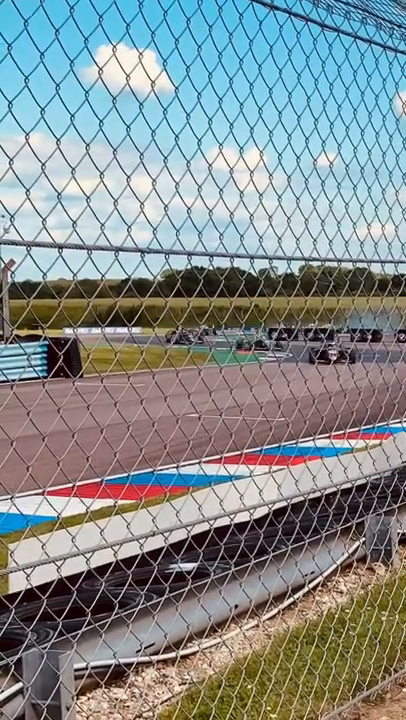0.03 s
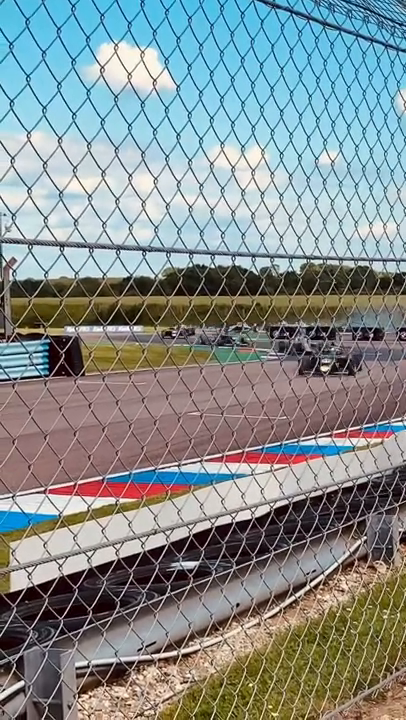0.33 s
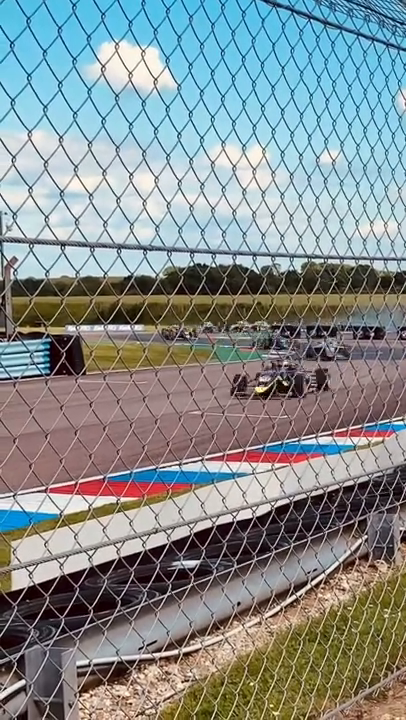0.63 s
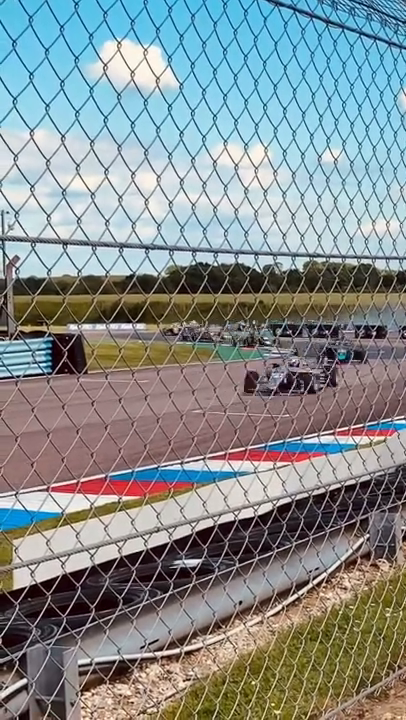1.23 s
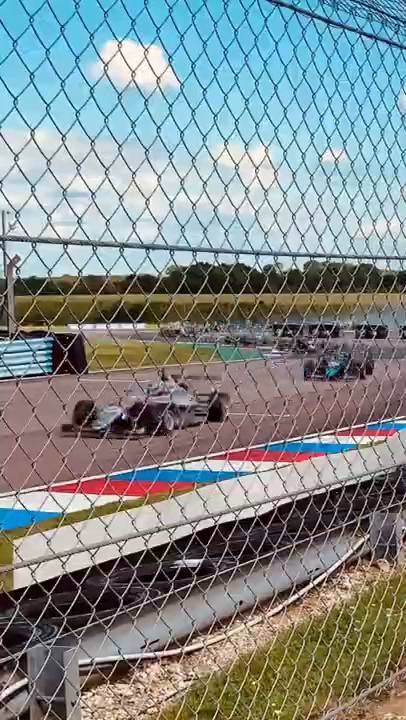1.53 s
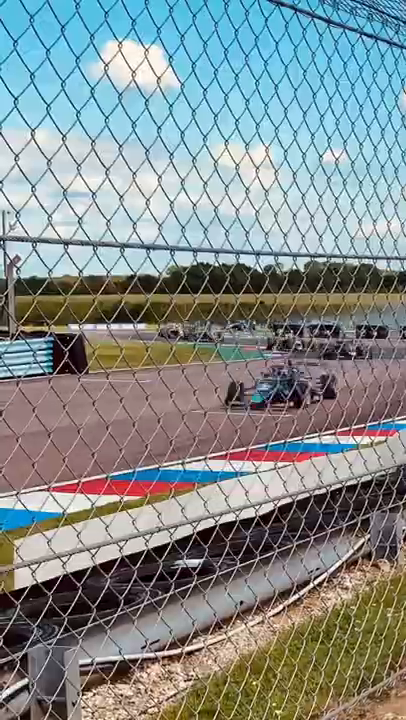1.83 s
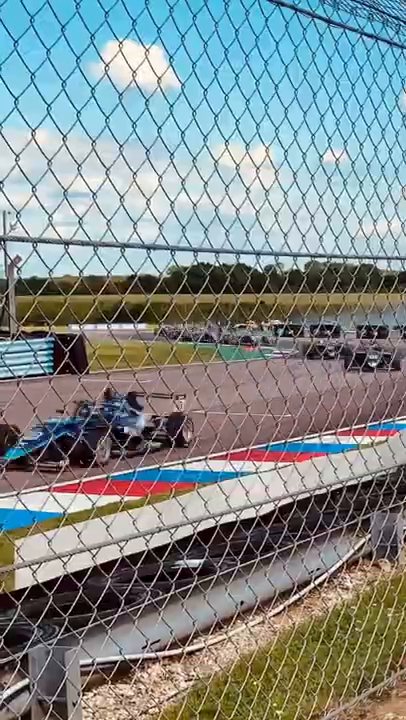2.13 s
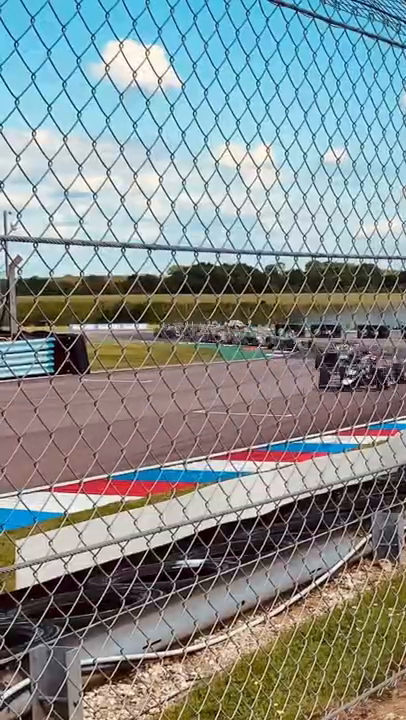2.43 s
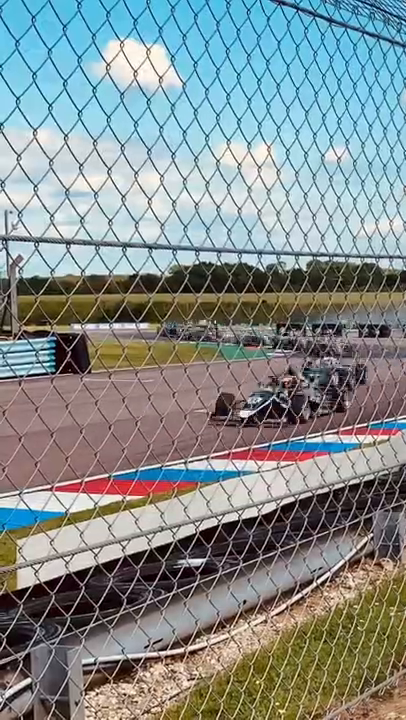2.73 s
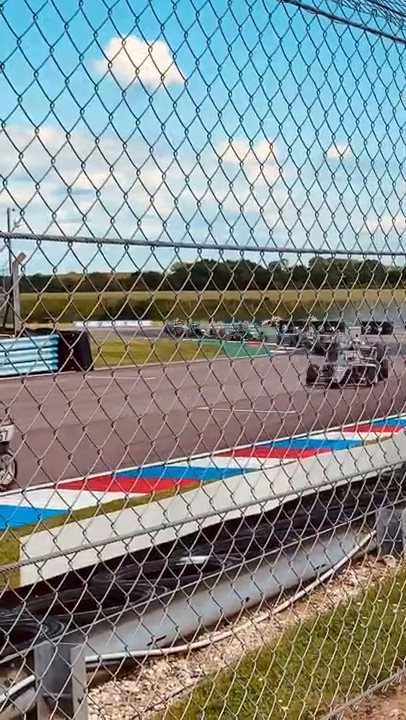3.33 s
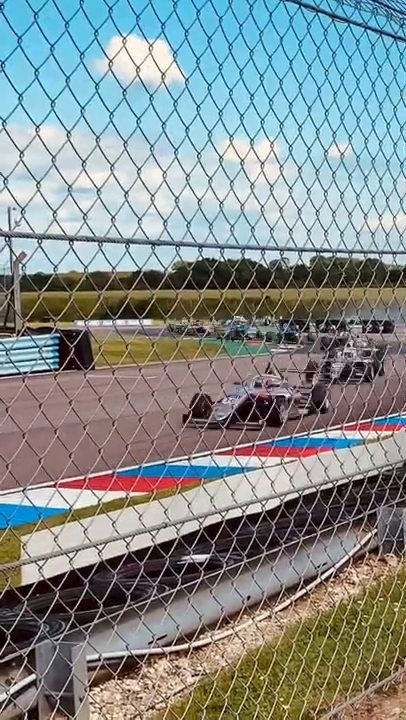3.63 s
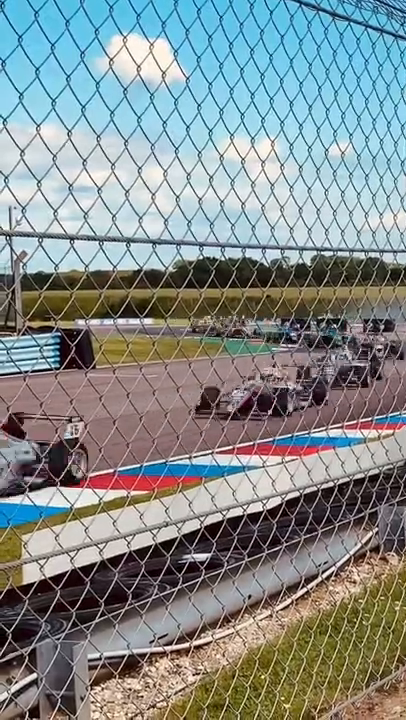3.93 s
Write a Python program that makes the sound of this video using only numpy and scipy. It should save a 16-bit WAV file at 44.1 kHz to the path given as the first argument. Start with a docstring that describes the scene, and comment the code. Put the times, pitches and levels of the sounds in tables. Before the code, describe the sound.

Race cars roar past a trackside fence, six in quick succession. Each engine drones, then drops in pitch with a barking, spitting exhaust rasp. The distant pack roars behind, tyres hiss, and wind bumps the microphone at first.

```python
"""Six single-seater race cars sweep past a trackside fence, one after another.
Each four-cylinder engine drones, drops in pitch as it shifts up and goes by, and throws out a bark
and a pulsing rasp from its exhaust. Spits, blurts and short whines cut in, and the pack roars behind.
Tyres hiss and wind bumps on two microphones that hear the middle pitches in opposite polarity:
one swings up while the other swings down."""
import sys
import numpy as np
from scipy import signal
from scipy.fft import rfft, irfft
from scipy.io import wavfile

SR = 44100
rng = np.random.default_rng(int(sys.argv[2]) if len(sys.argv) > 2 else 0)


def digitize_waveform(pressure):
    """Quantize a signal to 16-bit integers and store it at the path in sys.argv[1].

    Rows of a 2-D input are taken as channels; values are limited to [-1, 1].
    """
    field = np.atleast_2d(pressure).T
    bounded = np.clip(field, -1, 1)
    quanta = np.round(bounded * 32767).astype(np.int16)
    wavfile.write(sys.argv[1], SR, quanta)


N = 176400
T = np.arange(N) / SR
HZ = np.maximum(np.arange(N // 2 + 1) * SR / N, 1)

# One list per car. Each row: time in seconds, firings per second as heard, level in dB.
CAR_TRACKS = [
    [(0, 180.4, -26.5), (.25, 178.5, -32.5), (.42, 202.2, -14.5), (.7, 200.5, -18.5), (1.05, 197.9, -25),
     (1.15, 195.3, -42), (1.3, 166.3, -34), (1.6, 162, -45)],
    [(0, 198.6, -15.5), (.22, 198, -14), (.4, 203.9, -14.5), (.6, 207.9, -17), (.8, 212.5, -12),
     (1.0, 220.6, -14), (1.28, 217, -10.5), (1.325, 205.9, -11), (1.36, 181, -12), (1.45, 175.9, -16.5),
     (1.52, 173.9, -19), (1.59, 175.4, -14), (1.66, 164, -15), (1.76, 161.3, -16.5), (1.97, 162.1, -18),
     (2.2, 161, -26.5)],
    [(1.3, 212.6, -26), (1.65, 213.8, -23.5), (1.9, 215.9, -14.5), (2.0, 215.2, -14), (2.09, 201.9, -12.5),
     (2.12, 175.9, -17), (2.23, 172.3, -16.5), (2.35, 163.6, -17.5), (2.55, 161.5, -23),
     (2.9, 161.3, -27.5)],
    [(2.3, 205, -47), (2.5, 190.5, -20), (2.6, 181, -19), (2.72, 176.8, -16), (2.85, 165.8, -16.5),
     (3.05, 161, -21.5), (3.3, 162.8, -24), (3.6, 165.8, -21.5)],
    [(2.7, 215, -43), (2.95, 212.6, -26.5), (3.1, 201.3, -21.5), (3.18, 192.5, -18), (3.27, 178, -38),
     (3.42, 169, -18), (3.58, 165.4, -25.5), (3.68, 157.2, -18.5), (4, 155, -21.5)],
    [(3.3, 210.3, -53), (3.64, 195.3, -27), (3.77, 178.2, -16.5), (3.88, 171.4, -21), (4, 164.6, -17)],
]
# How each car goes by. Each row: time in seconds, half length in seconds, rasp level in dB,
# bark level in dB, boost in dB for the drone's tone one octave above the firing rate.
CAR_PASSES = [(1.166, 0.17, -28.5, -43, 8), (1.512, 0.082, -24, -19.5, 0.5), (2.142, 0.089, -24.5, -22, 3),
              (2.646, 0.082, -25.5, -20.5, -3.5), (3.5, 0.071, -28, -30, -5.5),
              (3.697, 0.067, -27, -21.5, -7)]
# The tone colour of the growl. Each row: frequency in Hz, level in dB.
GROWL_COLOUR = [(60, -34), (200, -17.5), (420, 12.5), (580, 1), (750, -11), (950, 4), (1300, -3),
                (1550, -10.5), (2100, -13), (2700, -6), (4000, -46), (8000, -56)]
def car(track, passing, fade_s=0.1):
    """One car drones and growls, and adds a bark and a rasp as it goes by."""
    hz, level_db = in_time(track)
    at, half, rasp_db, bark_db, octave_db = passing
    seconds_outside_track = np.maximum(np.maximum(track[0][0] - T, T - track[-1][0]), 0)
    level = from_db(level_db) * np.exp(-seconds_outside_track / fade_s)
    cycles, pulses, strength = firings(hz)
    growl = level * from_db(-14.5) * exhaust(pulses, GROWL_COLOUR)
    tailpipe = growl + bark(pulses, at, half, bark_db) + rasp(cycles, strength, at, half, rasp_db)
    return level * drone(cycles, hz, octave_db) + ground_bounce(tailpipe, at)


def firings(hz, wobble=0.006, cylinder_spread=0.27, firing_spread=0.25):
    """Four unequal cylinders fire in turn. Gives the running count, the pulses and their strength."""
    cycles = np.cumsum(hz * (1 + wobble * drift(14))) / SR + rng.random()
    cylinders = rng.standard_normal(4)
    cylinders = 1 + cylinder_spread * unit_level(cylinders - cylinders.mean())
    strengths = np.resize(cylinders, 2048) + firing_spread * rng.standard_normal(2048)
    count = cycles.astype(int)
    pulses = np.diff(count, prepend=count[0]) * strengths[count]
    return cycles, pulses, strengths[count]


# The engine's tones. An "order" is how many times a tone swings per turn of the crankshaft.
# Each row: order, level in dB coming closer, level in dB going away.
ENGINE_ORDERS = [(1, -24, -22), (2, -0.5, 1.5), (3, -23, -10), (4, -11, -0.5), (5, -15, -17),
                 (6, -19.5, -20), (7, -15, -20.5), (9, -23, -15), (12, -32, -24), (14, -40, -20.5),
                 (15, -31.5, -22), (16, -26, -24)]
# High tones that the leading cars sing under power. Each row: order, level in dB.
SINGING_ORDERS = [(11, 4), (12, 3.5), (13, -29), (14, 4.5)]
# How strong that singing is. Each row: time in seconds, level in dB.
SINGING_LOUDNESS = [(0, -28), (.35, -21), (.65, -19), (.9, -17.5), (1.03, -11.5), (1.17, -20), (1.3, -30),
                    (4, -29)]
def drone(cycles, hz, octave_db, coming_hz=201, going_hz=153.3):
    """The engine's tones change balance as the pitch falls and the tailpipe turns towards the fence."""
    going = np.clip((coming_hz - hz) / (coming_hz - going_hz), 0, 1)
    cycles = cycles + 0.0086 * drift(45)  # unsteady firing
    tones = 0
    for order, coming_db, going_db in ENGINE_ORDERS:
        db = coming_db + (going_db - coming_db) * going + octave_db * (order == 4)
        flutter_db = 2.22 + 1.5 * max(order - 4, 0) ** .5  # higher tones break up more
        tones += from_db(db + flutter_db * np.tanh(drift(18))) * tone(cycles, order)
    singing = sum(from_db(db) * tone(cycles, order) for order, db in SINGING_ORDERS)
    return tones + from_db(in_time(SINGING_LOUDNESS)[0]) * singing


def tone(cycles, order):
    """One clean engine tone. The crankshaft turns once for every two firings."""
    phase = np.pi * order * cycles + 2 * np.pi * rng.random()
    return np.sqrt(2) * np.sin(phase.astype(np.float32))


def exhaust(pulses, colour, ring_s=0.0085):
    """Each pulse rings on briefly in the pipe and bodywork."""
    ring = rng.standard_normal(2048) * np.exp(-np.arange(2048) / SR / ring_s)
    return coloured(signal.oaconvolve(pulses, ring)[:N], colour)


# The tone colour of barks and blurts. Each row: frequency in Hz, level in dB.
BARK_COLOUR = [(300, -38), (600, 16), (900, -19.5), (1150, 7.5), (1330, 3.5), (1700, 0.5), (2400, -9.5),
               (3200, -19), (4200, -20), (8000, -23.5)]
def bark(pulses, at, half, db, flutter_db=3.5, tail_s=0.26):
    """Uneven exhaust pulses swell just after the car arrives, then trail off."""
    since = T - at - 0.004
    tail = from_db(-5.5) * np.exp(-np.abs(since) / tail_s) * (since > 0)
    shape = np.maximum(1 / (1 + (since / half) ** 4), tail)
    level = from_db(db + flutter_db * drift(24))
    uneven_pulses = pulses * (1 + 0.54 * drift(84))
    return level * shape * exhaust(uneven_pulses, BARK_COLOUR)


# The tone colour of rasps and spits. Each row: frequency in Hz, level in dB.
RASP_COLOUR = [(700, -51), (1800, -27), (2700, 6.5), (4000, 6), (5400, -5.5), (7300, 0.5), (9500, 1),
               (12000, -8.5), (15500, -5)]
def rasp(cycles, strength, at, half, db, steepness=17.2):
    """Each firing lets out a hissing puff of gas, heard only while the car is close."""
    near = 1 / np.sqrt(1 + np.abs((T - at) / half) ** steepness)
    puff_db = -rng.standard_normal(2048)[cycles.astype(int)]
    puffs = np.exp(-0.9 * np.cos(2 * np.pi * cycles)) * strength * from_db(puff_db)
    level = from_db(db + 1.5 * drift(25))
    gas = (.5 + unit_level(puffs)) * rng.standard_normal(N)
    return level * near * coloured(gas, RASP_COLOUR)


def ground_bounce(x, at, longest_lag_s=0.000843, sweep_s=0.29, share=.5):
    """The bounce off the asphalt lags most when the car is closest, so the colour sweeps down and up."""
    lag = longest_lag_s / np.sqrt(1 + ((T - at) / sweep_s) ** 2)
    return (x + share * np.interp(T - lag, T, x)) / np.sqrt(1 + share ** 2)


# Sharp spits of the exhausts. Each row: start in seconds, level in dB.
SPITS = [(1.13, -18.5), (1.324, -24), (1.463, -22), (1.595, -19.5), (2.067, -19.5), (2.656, -22),
         (2.673, -19), (3.637, -20.5)]
def spits(decay_s=0.013):
    """Each exhaust spit is a burst of noise that starts at once and dies quickly."""
    shape = sum(from_db(db) * (T > at) * np.exp(-np.abs(T - at) / decay_s) for at, db in SPITS)
    return shape * noise(RASP_COLOUR)


# Exhaust blurts. Each row: middle in seconds, half length in seconds, level in dB.
BLURTS = [(1.33, .04, -25), (2.295, 0.036, -31), (2.938, 0.035, -27.5), (3.15, .04, -23)]
def blurts(firing_hz=175.8):
    """Uneven pulses ring in the exhaust and make gritty blurts between the passes."""
    _, pulses, _ = firings(firing_hz * (1 + 0.024 * drift(3)))
    uneven_pulses = pulses * (1 + 0.54 * drift(126))
    shape = sum(from_db(db) * swell(at, half) for at, half, db in BLURTS)
    return shape * exhaust(uneven_pulses, BARK_COLOUR)


# Whines. Each row: middle in seconds, half length in seconds, top pitch in Hz, level in dB.
SHORT_WHINES = [(0.491, 0.041, 1227, -19), (1.36, 0.053, 783, -18.5), (1.658, 0.021, 1320, -24.5),
                (1.785, 0.061, 1319, -24.5), (2.371, 0.044, 1285, -28)]
def whines(arch=.03):
    """Short stuttering whines, each rising and falling a little in pitch."""
    waver = 1 + 0.0079 * drift(38)
    stutter = from_db(5.5 * drift(35))
    out = 0
    for at, half, hz, db in SHORT_WHINES:
        shape = swell(at, half)
        pitch = hz * waver * (1 - arch * (1 - shape))
        out += from_db(db) * shape * tone(np.cumsum(pitch) / SR, order=2)
    return out * stutter


# The distant pack, and the lower-sounding bunch that follows the leaders.
# Each number: firings per second of one engine.
PACK_RATES = [185.9, 202.3, 212.7]
BUNCH_RATES = [156.85, 177.4, 192.2]
# Their tone colours. Each row: frequency in Hz, level in dB.
PACK_COLOUR = [(60, -16), (130, -11), (180, 11.5), (280, -12.5), (360, -3.5), (420, 0), (560, 1), (750, 1),
               (880, 0), (1250, -4), (1600, -5.5), (2200, -12), (4000, -24), (8000, -42), (15000, -72)]
BUNCH_COLOUR = [(70, -35), (120, -16), (180, -2.5), (270, -5), (370, -6.5), (480, -6.5), (600, 1),
                (750, -1), (1100, -28), (3000, -40)]
# How loud they are. Each row: time in seconds, level in dB.
PACK_LOUDNESS = [(0, -18), (0.401, -16), (0.801, -14.5), (1.3, -16), (1.55, -22.5), (1.95, -24.5),
                 (2.4, -25.5), (3, -27.5), (3.4, -21), (4, -32)]
BUNCH_LOUDNESS = [(0, -36), (1.501, -33.5), (1.95, -24), (2.25, -26.5), (2.8, -24), (3.1, -23),
                  (3.3, -22.5), (3.7, -18.5), (4, -18)]
def far_cars(rates, colour, loudness, noise_db):
    """Far engines, each wandering in speed, half blur into a roar."""
    pulses = sum(firings(hz * (1 + .015 * drift(.7)))[1] for hz in rates)
    roar = from_db(-3) * exhaust(pulses, colour) + from_db(noise_db) * noise(colour)
    return from_db(in_time(loudness)[0]) * roar


# How loud the tyres are. Each row: time in seconds, level in dB.
TYRE_LOUDNESS = [(0, -41.5), (.35, -39), (.48, -32.5), (.6, -36), (.9, -30), (1.05, -28), (1.4, -29),
                 (1.8, -28), (1.97, -31), (2.3, -30.5), (2.48, -31.5), (2.7, -33.5), (3.02, -32.5),
                 (3.15, -30.5), (3.25, -33), (3.55, -29), (3.85, -31.5), (4, -31)]
# The tone colours of their hiss and brighter sizzle. Each row: frequency in Hz, level in dB.
HISS_COLOUR = [(600, -1.5), (1400, 5.5), (2500, 1.5), (3800, 1.5), (5400, -4), (7300, -5.5), (10000, -6.5),
               (15500, -45)]
SIZZLE_COLOUR = [(3000, 10), (5400, 5), (7300, -16), (10000, -2), (12000, -7), (15500, -1.5)]
def tyres(flicker_db=3):
    """Tyres and torn air hiss with a slight flicker, and sound brighter when close."""
    hiss_db = in_time(TYRE_LOUDNESS)[0]
    sizzle_db = -39 + 2.1 * (hiss_db + 31)  # grows faster than the hiss
    flicker = from_db(flicker_db * np.tanh(drift(11.4)))
    return flicker * (from_db(hiss_db) * noise(HISS_COLOUR) + from_db(sizzle_db) * noise(SIZZLE_COLOUR))


# How loud the wind is. Each row: time in seconds, level in dB.
WIND_LOUDNESS = [(0, -18), (.25, -20.5), (.38, -19.5), (.6, -20), (.85, -20.5), (1.1, -30.5), (1.5, -63),
                 (2.2, -47), (2.6, -34), (4, -42)]
# Its tone colour. Each row: frequency in Hz, level in dB.
WIND_COLOUR = [(18, -33), (30, -27), (42, -10.5), (65, -4), (100, -3), (160, -4.5), (300, -5.5), (800, -65)]
def wind():
    """Wind bumps on the microphones and makes a lumpy rumble."""
    return from_db(in_time(WIND_LOUDNESS)[0] + 1.15 * drift(9.1)) * noise(WIND_COLOUR)


def echoes(x, count=8, bass_cut_hz=900, treble_cut_hz=8300):
    """Barriers and fence throw back quick echoes, thin in the bass."""
    lags = (rng.uniform(0.00297, .04, count) * SR).astype(int)
    bounces = sum(np.pad(x, (lag, 0))[:N] for lag in lags) / np.sqrt(count)
    kept = HZ / (HZ + bass_cut_hz) / (1 + (HZ / treble_cut_hz) ** 2)
    return from_db(-14.5) * filtered(bounces, kept)


def from_db(db):
    """Turn decibels into a number to multiply by."""
    return 10 ** (db / 20)


def unit_level(x):
    """Scale a signal so that its average power is 1."""
    return x / np.sqrt(np.mean(x ** 2) + 1e-20)


def in_time(rows):
    """Join a table's rows by straight lines over time, giving one curve per value column."""
    seconds, *columns = np.transpose(rows)
    return [np.interp(T, seconds, column) for column in columns]


def over_hz(rows):
    """Join a table's rows by straight lines over frequency, with every octave equally wide."""
    hz, value = np.transpose(rows)
    return np.interp(np.log(HZ), np.log(hz), value)


def filtered(x, gains):
    """Multiply each frequency in a signal by its own gain."""
    return irfft(rfft(x) * gains, N)


def coloured(x, colour):
    """Give a signal a tone colour, at unit level."""
    return unit_level(filtered(x, from_db(over_hz(colour))))


def noise(colour):
    """Noise with a tone colour, at unit level."""
    return coloured(rng.standard_normal(N), colour)


def drift(rate_hz, size=4096):
    """A random wander of about 1 either way, mostly slower than the given rate."""
    hz = np.arange(size // 2 + 1) * SR / N
    slow = irfft(rfft(rng.standard_normal(size)) / (1 + (hz / rate_hz) ** 2))
    return np.interp(T, np.linspace(0, N / SR, size), unit_level(slow))


def swell(at, half):
    """A smooth rise and fall around a moment."""
    return np.exp(-((T - at) / half) ** 2)


# How far the left microphone's wave runs ahead of the right's. Each row: frequency in Hz, radians.
LEFT_MIC_PHASE = [(80, 0.5), (130, -1.5), (200, -3.3), (330, -2.5), (450, -3.5), (800, -3.5), (1700, -4),
                  (4300, -4), (5400, -3.5), (7700, 0.24), (9300, 0.74), (11400, 3), (12500, 19),
                  (14000, 1.5), (16000, 9.5)]
# How loud the left is next to the right. Each row: frequency in Hz, level in dB.
LEFT_MIC_LEVEL = [(60, -3.5), (160, -19.5), (215, -26.5), (330, -4.5), (450, 0), (16000, -0.5)]
def scene():
    """Everything reaches two unlike microphones, and some hiss arrives from all around."""
    mix = sum(car(track, passing) for track, passing in zip(CAR_TRACKS, CAR_PASSES))
    mix += far_cars(PACK_RATES, PACK_COLOUR, PACK_LOUDNESS, noise_db=-4)
    mix += far_cars(BUNCH_RATES, BUNCH_COLOUR, BUNCH_LOUDNESS, noise_db=-7.5)
    mix += spits() + blurts() + whines() + tyres() + wind()
    left = filtered(mix, from_db(over_hz(LEFT_MIC_LEVEL)) * np.exp(1j * over_hz(LEFT_MIC_PHASE)))
    return np.array([direct + echoes(direct) + from_db(-13) * tyres() for direct in (left, mix)])


# How much bass the two sides share. Each row: time in seconds, share from 0 to 1.
SHARED_BASS = [(0, 0.06), (1.3, 0.01), (1.7, 0.05), (2.75, 0.25), (2.95, .97), (4, 0.99)]
def record(dry, bass_hz=510, ceiling=.95, cutoff_hz=16000):
    """The bass narrows to the centre, loud peaks are rounded and the highest treble is cut."""
    left, right = dry
    bass_gap = filtered(right - left, 1 / (1 + (HZ / bass_hz) ** 6))
    out = np.array([left + in_time(SHARED_BASS)[0] * bass_gap, right])
    rounded = out / (1 + np.abs(out / ceiling) ** 10) ** .1
    return filtered(rounded, 1 / (1 + (HZ / cutoff_hz) ** 120))


dry = scene()
out = record(dry)
digitize_waveform(out)
```